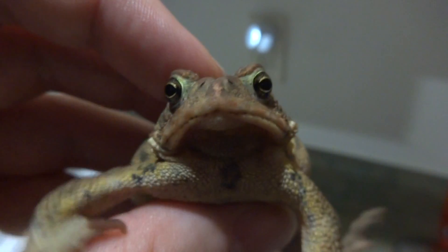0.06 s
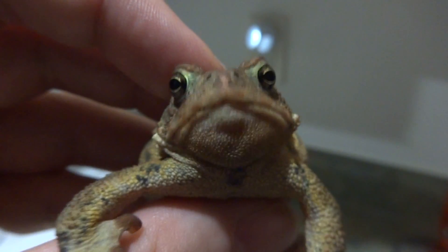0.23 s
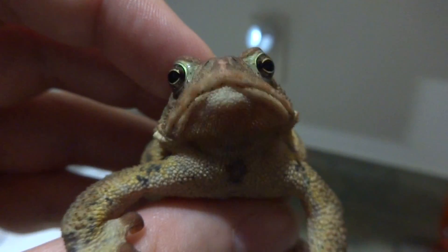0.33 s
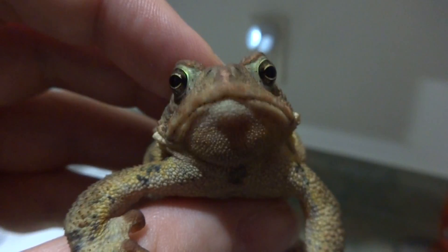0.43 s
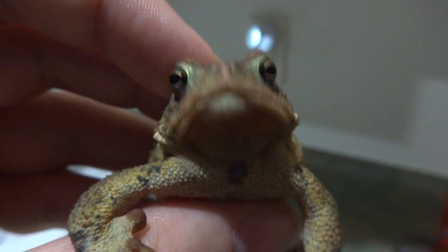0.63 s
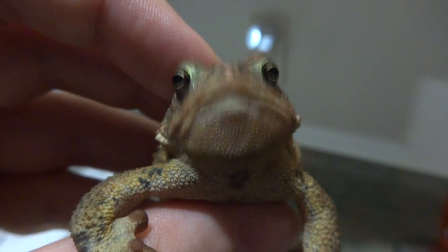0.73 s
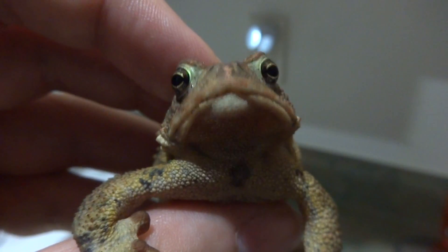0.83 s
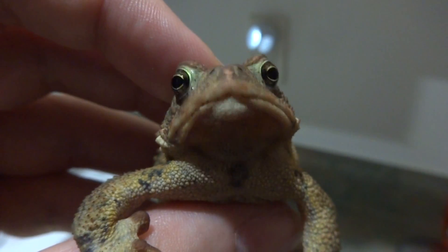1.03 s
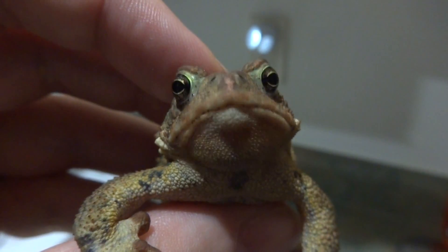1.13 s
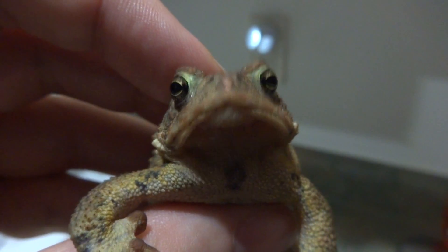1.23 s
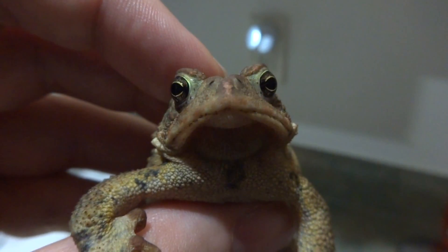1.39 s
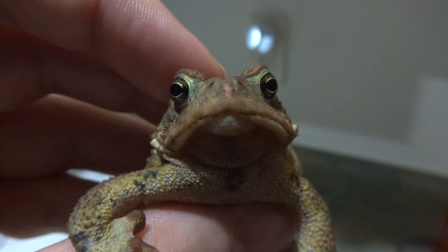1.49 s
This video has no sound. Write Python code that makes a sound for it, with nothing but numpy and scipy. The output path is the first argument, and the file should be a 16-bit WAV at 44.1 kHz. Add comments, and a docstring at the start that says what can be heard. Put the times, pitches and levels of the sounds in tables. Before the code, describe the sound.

A held toad chirps five times in quick, even succession. The chirps are high, fluttering squeaks, most dropping into a tiny croak. It is close to the microphone in a small room with a faint low hum.

```python
"""A toad held in the hand gives five release chirps, close up, in a small room with a low hum.
Each chirp opens with a pip and a thin whistle of the larynx. All but the first break into a loud,
fluttering squeak near 3 kHz; all but the last end in a falling croak, where the slackening
membranes add a tone near half their pitch. Quick echoes off the hand and a short room tail follow."""
import sys
import numpy as np
from scipy import signal
from scipy.fft import rfft, irfft
from scipy.io import wavfile

SR = 44100
rng = np.random.default_rng(int(sys.argv[2]) if len(sys.argv) > 2 else 0)


def wav_out(sig):
    """Save sig, one row per channel (or a flat mono array), as 16-bit PCM at SR to the path in sys.argv[1]."""
    wavfile.write(sys.argv[1], SR, np.round(np.clip(np.atleast_2d(sig).T, -1, 1) * 32767).astype(np.int16))


N = 68355
TIME = np.arange(N) / SR
JITTER_HZ, CUTOFF_HZ = 680, 16000

# air rasping through the slack membranes of a pip or croak: (frequency [Hz], relative level [dB])
SLACK_RASP = [(450, -34.5), (750, 1), (1200, 12.5), (2200, 23.5), (3300, 14.5), (4500, -16), (5700, -3),
              (6700, -8.5), (7400, 1), (8500, -11), (9900, -33), (10900, -12), (12200, -9), (13200, -1.5),
              (15800, -2.5)]


def from_db(db):
    """Decibels to gain."""
    return 10 ** (np.asarray(db) / 20)


def rms_one(x):
    """Scale to unit rms."""
    return x / np.sqrt(np.mean(x ** 2) + 1e-20)


def gain_at(spectrum, hz):
    """Gain of a (frequency [Hz], level [dB]) table at the given frequencies."""
    freqs, db = np.transpose(spectrum)
    return from_db(np.interp(np.log(np.maximum(hz, 1)), np.log(freqs), db))


def coloured(spectrum, x):
    """Equalise a signal with a (frequency [Hz], level [dB]) table."""
    freqs = np.arange(len(x) // 2 + 1) * SR / len(x)
    return irfft(rfft(x) * gain_at(spectrum, freqs), len(x))


def drift(rate_hz):
    """Random wander of unit rms, up to about the given rate."""
    freqs = np.arange(N // 2 + 1) * SR / N
    return rms_one(irfft(rfft(rng.standard_normal(N)) / (1 + (freqs / rate_hz) ** 2), N))


def follow(curve, fade_s=.003):
    """Turn timed breakpoints into a soft gate and one automation lane per value column."""
    times, *columns = np.transpose(sorted(map(tuple, curve)))
    inside_s = np.minimum(TIME - times[0], times[-1] - TIME)
    gate = np.sin(np.pi / 2 * np.clip(inside_s / fade_s + .5, 0, 1)) ** 2
    return [gate] + [np.interp(TIME, times, column) for column in columns]


def stereo(mid, side):
    """Left and right from mid and side."""
    return np.array([mid + side, mid - side])


def background():
    """A wavering appliance hum over soft room noise."""
    # hum partials: (frequency [Hz], level [dB])
    partials = [(84.3, -54.5), (120, -60), (253, -63.5), (338, -71)]
    # colour of the room noise: (frequency [Hz], relative level [dB])
    air = [(25, -16.5), (45, -9), (70, 2), (110, -4), (160, -4), (280, -1.5), (450, -6.5), (700, -9.5),
           (1200, -6), (2200, -14), (3500, -22.5), (6000, -30.5), (10000, -31.5), (16000, -38.5)]
    # its stereo width: (frequency [Hz], side against mid [dB])
    width = [(40, -13), (120, -13.5), (300, -4.5), (1200, -2.5), (6000, -2.5), (12000, -10)]
    waver_db, air_db = .17, -56
    hum = 0
    for hz, db in partials:
        level = from_db(db + waver_db * drift(rate_hz=4.1))
        hum += level * np.sqrt(2) * np.sin(2 * np.pi * (hz * TIME + rng.random()))
    mid, side = [rms_one(coloured(air, rng.standard_normal(N))) for _ in range(2)]
    return hum + from_db(air_db) * stereo(mid, coloured(width, side))


def vibrate(hz, jitter):
    """Phase of a membrane whose pitch wavers by the fraction `jitter`."""
    return 2 * np.pi * np.cumsum(hz * (1 + jitter * drift(JITTER_HZ))) / SR


def tone(phase, hz, overtones, brightness=1):
    """A membrane's strong fundamental, at unit rms, with weak overtones coloured by the throat."""
    upper = sum(gain_at(overtones, k * hz) * (k * hz < CUTOFF_HZ) * np.sin(k * phase)
                for k in range(2, 7))
    return np.sqrt(2) * (np.sin(phase) + brightness * upper)


def rasp(phase, spectrum):
    """Air noise let through the membranes once a cycle."""
    puffs = rng.standard_normal(N) * (1 + np.cos(phase))
    return rms_one(coloured(spectrum, puffs))


def pip(start_s, length_s, first_hz, last_hz, db):
    """A tiny glide and a little rasp under one smooth swell: the larynx opening or shutting, or a soft short
    squeak."""
    # throat colour: (frequency [Hz], level against the fundamental [dB])
    overtones = [(2000, -17), (3500, -21.5), (7000, -50.5), (10000, -57.5), (14000, -45)]
    progress = np.clip((TIME - start_s) / length_s, 0, 1)
    hz = first_hz + (last_hz - first_hz) * progress
    phase = vibrate(hz, jitter=.03)
    grit = from_db(-13.5) * rasp(phase, SLACK_RASP)
    return from_db(db) * np.sin(np.pi * progress) * (tone(phase, hz, overtones) + grit)


def whistle(curve):
    """The tight larynx sings a thin, grainy line whose octave flashes up where the pitch is high."""
    # throat colour on the octave: (frequency [Hz], gain [dB])
    octave_colour = [(10200, -27), (11000, -6.5), (12000, 6.5), (13000, 11)]
    reference_db, octave_base_db, rise_db_per_s = -26.5, -60.5, 14
    gate, hz, db = follow(curve)
    phase = vibrate(hz, jitter=.004)
    # the octave follows half the whistle's swing in dB and grows from chirp to chirp
    octave_db = octave_base_db + .5 * (db - reference_db) + rise_db_per_s * TIME
    octave = from_db(octave_db) * gain_at(octave_colour, 2 * hz) * np.sin(2 * phase)
    grain = 1 + .2 * drift(JITTER_HZ)
    return gate * grain * np.sqrt(2) * (from_db(db) * np.sin(phase) + octave)


def croak(curve):
    """Slackening membranes fall in pitch and alternate strong and weak swings, adding a half pitch."""
    # throat colour: (frequency [Hz], level against the fundamental [dB])
    overtones = [(3500, -31), (4600, -24.5), (5600, -42), (7000, -26.5), (8200, -39), (10000, -47.5),
                 (12000, -43.5), (15000, -42)]
    # irregular swings around the half pitch: (frequency [Hz], relative level [dB])
    rattle_colour = [(450, -39.5), (620, -19), (750, 15.5), (900, 5), (1200, 16.5), (1800, 4.5),
                     (3000, -38.5)]
    throat_hz, rasp_boost_db = 1083, 13.5
    gate, hz, db, half_db, rasp_db = follow(curve)
    phase = vibrate(hz, jitter=.0117)
    half_phase = vibrate(np.maximum(hz / 2, throat_hz), jitter=.028)   # settles on the throat resonance
    coupling = np.minimum(from_db(db - half_db), 1)   # the half pitch rings clean as the main swing dies
    rattle = from_db(-9) * rms_one(coloured(rattle_colour, rng.standard_normal(N)))
    sum_tone = from_db(-18.5) * np.sqrt(2) * np.sin(half_phase + phase)
    undertone = np.sqrt(2) * np.sin(half_phase) + coupling * (sum_tone + rattle)
    grit = from_db(rasp_db + rasp_boost_db) * rasp(phase, SLACK_RASP)
    return gate * (from_db(db) * tone(phase, hz, overtones) + from_db(half_db) * undertone + grit)


def squeak(surge_s, flutter_hz, curve):
    """Taut membranes flutter more the harder the push; each surge dips the pitch and puffs out rasp."""
    # throat colour at full effort: (frequency [Hz], level against the fundamental [dB])
    overtones = [(5000, -26), (6000, -26), (8500, -30.5), (10000, -57.5), (11500, -39.5), (13200, -26),
                 (15000, -31)]
    # air rasping through taut membranes: (frequency [Hz], relative level [dB])
    taut_rasp = [(700, -4.5), (1250, 8.5), (2200, 18.5), (3200, 12.5), (4400, -12), (5600, -0.5),
                 (6600, -8), (7100, -9), (8400, 0), (9900, -32), (10900, -3.5), (12200, -8), (13200, 9),
                 (15700, 2)]
    full_effort_db, pitch_bend, tremolo_depth = -8, .078, .55
    gate, hz, db = follow(curve)
    effort = np.minimum(from_db(db - full_effort_db), 1)
    flutter = effort * np.cos(2 * np.pi * flutter_hz * (TIME - surge_s))
    phase = vibrate(hz * (1 - pitch_bend * flutter), jitter=.012)
    voice = tone(phase, hz, overtones, brightness=effort ** .18)
    grit = from_db(-15.5) * np.sqrt(effort) * (1 + flutter) * rasp(phase, taut_rasp)
    return gate * from_db(db) * (1 + tremolo_depth * flutter) * (voice + grit)


def room_tail():
    """Impulse response of dense reflections whose treble dies sooner than their body."""
    # reverb colour: (frequency [Hz], gain [dB])
    colour = [(400, -18), (600, -18), (800, -5), (1100, -14.5), (1600, -18.5), (2300, -22.5), (3000, -22.5),
              (4500, -15.5), (6500, -9.5), (9000, -14), (15000, -17.5)]
    predelay_s, crossover_hz, body_t60_s, treble_t60_s = .0079, 3800, .34, .26
    noise = coloured(colour, rng.standard_normal(N))
    body = signal.sosfiltfilt(signal.butter(2, crossover_hz, fs=SR, output="sos"), noise)
    body_fade, treble_fade = [from_db(-60 * TIME / t60) * (TIME > predelay_s)
                              for t60 in (body_t60_s, treble_t60_s)]
    return (body * body_fade + (noise - body) * treble_fade) / np.linalg.norm(body_fade)


def room(direct):
    """The direct sound, quick echoes off the hand and the dense tail of the room."""
    # early reflections: (delay [s], level [dB])
    echoes = [(.0031, -18), (.0083, -21.5)]
    # their stereo width, greatest in the treble: (frequency [Hz], side against mid [dB])
    width = [(1000, -5.5), (2600, -10.5), (5000, 0), (12000, -3)]
    early = sum(from_db(db) * np.roll(direct, int(delay_s * SR)) for delay_s, db in echoes)
    tail_mid, tail_side = [signal.fftconvolve(direct, room_tail())[:N] for _ in range(2)]
    return stereo(direct + early + tail_mid, coloured(width, early) + from_db(-12) * tail_side)


def scene():
    """The toad, centred and close, in its humming room."""
    # larynx pips, and a few soft short squeaks near 3 kHz played the same way: (start [s], length [s], first
    # pitch [Hz], last pitch [Hz], level [dB])
    pips = [(0.2099, 0.0043, 2100, 1430, -22), (0.2116, 0.0041, 1607, 1864, -15.5),
            (.212, 0.0054, 2800, 3080, -31.5), (0.384, 0.0036, 1800, 2400, -32.5),
            (0.387, 0.013, 2467, 2700, -36.5), (0.552, 0.005, 1900, 1060, -32.5),
            (0.6242, 0.014, 1225, 1000, -42), (0.643, 0.0034, 1780, 2540, -39.5),
            (0.67, 0.0075, 3050, 2980, -45.5), (0.855, 0.0019, 3250, 1950, -40),
            (0.8754, 0.0017, 1262, 940, -36), (0.877, 0.0026, 1850, 2220, -37.5),
            (0.906, 0.016, 2710, 3100, -42.5), (0.964, 0.0083, 2905, 2935, -31),
            (1.0946, 0.002, 1100, 1920, -38.5), (1.0995, 0.0056, 1880, 2270, -40),
            (1.213, 0.0056, 1756, 1750, -39), (1.2152, 0.0043, 1180, 1180, -37)]
    # thin whistles, one curve each: (time [s], pitch [Hz], level [dB])
    whistles = [
        [(0.217, 6010, -56), (0.224, 6245, -43), (0.234, 6220, -37), (0.24, 6050, -60), (0.246, 6390, -48),
         (0.255, 6150, -38), (0.258, 6010, -45), (0.265, 6270, -34), (0.273, 5660, -46), (0.281, 6090, -51.5),
         (0.289, 5430, -51)],
        [(0.387, 3634, -50), (0.397, 5500, -59), (0.402, 5760, -47.5), (0.41, 5880, -47), (0.419, 5950, -60),
         (0.422, 6640, -37.5), (0.426, 6660, -36.5), (0.431, 5710, -36.5), (0.438, 6100, -40),
         (0.443, 6740, -44.5)],
        [(0.538, 5400, -51.5), (0.543, 5150, -51.5)],
        [(0.645, 4830, -59.5), (0.65, 4850, -49), (0.659, 5270, -59.5), (0.664, 5760, -49), (0.669, 5620, -38),
         (0.676, 5930, -54), (0.682, 5530, -77), (0.686, 6760, -48.5), (0.69, 5530, -40), (0.694, 5440, -34.5),
         (0.7, 5560, -45)],
        [(0.738, 6010, -47), (0.742, 6330, -52), (0.748, 5050, -38), (0.755, 5650, -53)],
        [(0.88, 5150.0, -57), (0.892, 5030, -49), (0.897, 5260, -56.5), (0.901, 6380, -52.5),
         (0.905, 5500, -42), (0.91, 5455, -33), (0.916, 5430, -47.5), (0.92, 6220, -52), (0.924, 5860, -40),
         (0.928, 5340, -35), (0.933, 5430, -39.5)],
        [(0.955, 5820.0, -45), (0.96, 5850, -48), (0.966, 5300, -38.5), (0.973, 6100, -53.5),
         (0.979, 5430, -43), (0.983, 4900, -49)],
        [(1.109, 6190, -62), (1.115, 5800, -48), (1.119, 6080, -61), (1.125, 6350, -52), (1.133, 6160.0, -52),
         (1.141, 5650, -59), (1.147, 6500, -62.5), (1.153, 5410, -38.5), (1.159, 5680, -65)],
        [(1.2, 5880, -55.5), (1.203, 5780, -53), (1.209, 5160, -52.5)],
    ]
    # falling croaks, one curve each:
    # (time [s], pitch [Hz], level [dB], half-pitch level [dB], rasp before its boost [dB])
    croaks = [
        [(.272, 3078, -36, -80, -76), (.275, 2939, -30.5, -70, -74), (.283, 3012, -27, -70.5, -71),
         (.2888, 2817, -26.5, -62, -72), (.291, 2275, -15.5, -51.5, -42), (.297, 2178, -17.5, -51.5, -65),
         (.3012, 1975, -18.5, -54.5, -45), (.304, 1680, -17, -35.5, -60), (.308, 1740, -36, -72.5, -74)],
        [(.494, 3161, -33, -66, -67), (.497, 3047, -23, -67.5, -66), (.4995, 2908, -22, -66.5, -54.5),
         (.5012, 2664, -16, -38, -35.5), (.508, 2320, -12.5, -25, -34), (.5125, 2166, -15.5, -40, -47.5),
         (.5155, 2307, -19.5, -28, -44), (.5195, 2553, -25, -34, -55.5), (.5235, 2132, -10.5, -38.5, -36.5),
         (.527, 2250, -25, -23, -40.5), (.529, 2340, -18, -32, -55.5), (.532, 2280, -28, -45.5, -64)],
        [(.747, 2960, -44, -68.5, -60.5), (.752, 2756, -23.5, -68, -65.5), (.7585, 2784, -34, -58, -40),
         (.7612, 2376, -16.5, -33, -36), (.765, 2187, -14, -20.5, -56), (.769, 1963, -19, -20, -43.5),
         (.773, 1610, -22, -36.5, -53), (.778, 1790, -30.5, -33, -68), (.783, 1830, -40, -48, -75)],
        [(.981, 2693, -30, -56, -32.5), (.983, 2375, -15.5, -23, -48), (.9875, 2142, -19.5, -19.5, -49),
         (.9905, 1574, -21, -37, -50), (.994, 2376, -37.5, -25, -75), (1.002, 2270, -51, -33, -72)],
    ]
    # loud squeaks: (surge time [s], flutter rate [Hz], curve of (time [s], pitch [Hz], level [dB]))
    squeaks = [ (0.4415, 292, [(.433, 3280, -33), (.4375, 3380, -28), (.441, 3130, -16.5),
               (.447, 2820, -14), (.4522, 2753, -17), (.4565, 2844, -26.5), (.462, 3107, -21),
               (.469, 3040, -29)]), (0.7045, 176, [(.69, 3220, -49), (.698, 3233, -26.5),
               (.7012, 3088, -20.5), (.7035, 2935, -15.5), (.71, 2744, -15), (.713, 2776, -24),
               (.722, 3120, -25.5), (.728, 3030, -24), (.733, 3040, -38.5)]),
               (0.9412, 243.4, [(.926, 2903, -51.5), (.9315, 3007, -21.5), (.938, 3150, -25),
               (.9412, 2914, -15), (.946, 2766, -14), (.949, 2870, -22.5), (.953, 2804, -32),
               (.958, 2800, -43)]), (1.1649, 240, [(1.151, 3189, -35.5), (1.156, 2956, -26.5),
               (1.1585, 3011, -24.5), (1.1625, 3123, -24), (1.1652, 2811, -13.5), (1.1735, 2635, -18),
               (1.178, 2806, -26), (1.182, 3095, -26), (1.1865, 2893, -25), (1.195, 2680, -32)])]
    toad = sum(map(whistle, whistles))
    toad += sum(squeak(*row) for row in squeaks)
    toad += sum(map(croak, croaks))
    toad += sum(pip(*row) for row in pips)
    return room(toad) + background()


def record(dry):
    """A steep low-pass cuts the very top."""
    return signal.sosfilt(signal.ellip(12, .1, 80, CUTOFF_HZ, fs=SR, output="sos"), dry)


dry = scene()
out = record(dry)
wav_out(out)
```